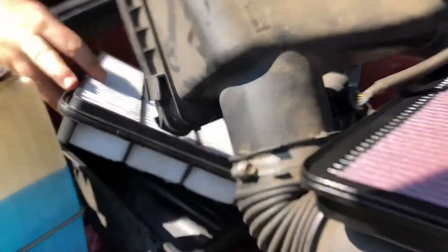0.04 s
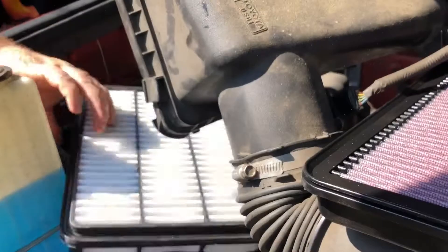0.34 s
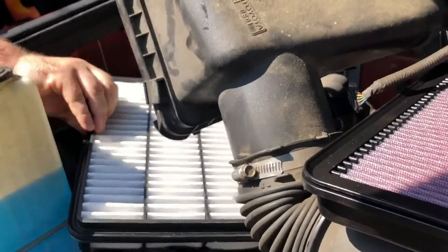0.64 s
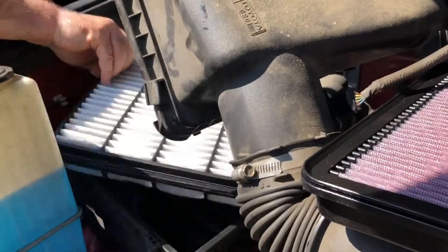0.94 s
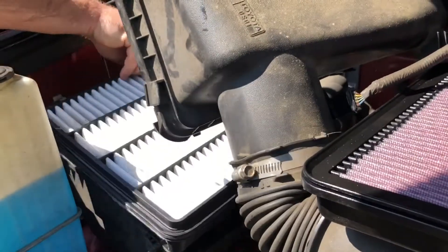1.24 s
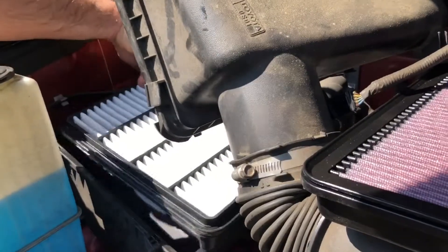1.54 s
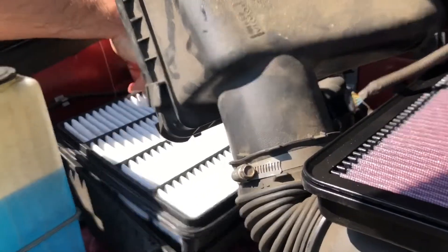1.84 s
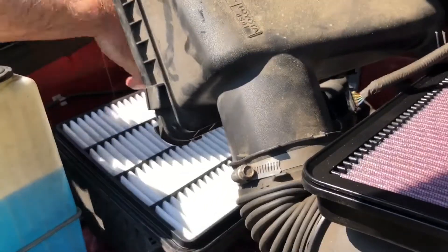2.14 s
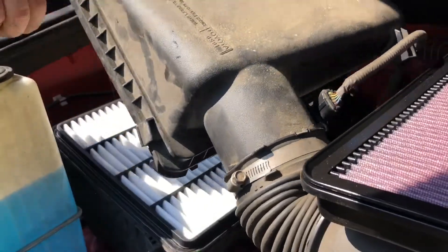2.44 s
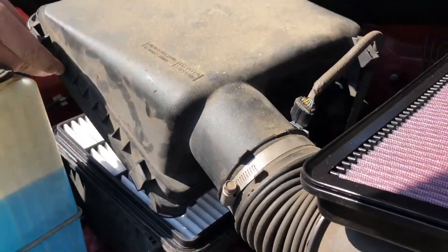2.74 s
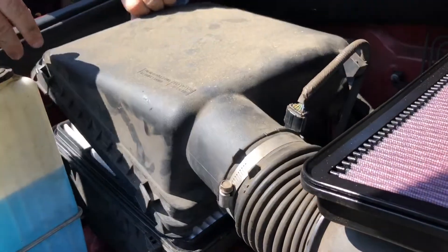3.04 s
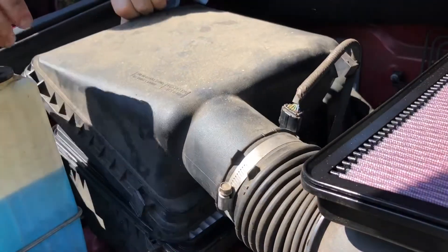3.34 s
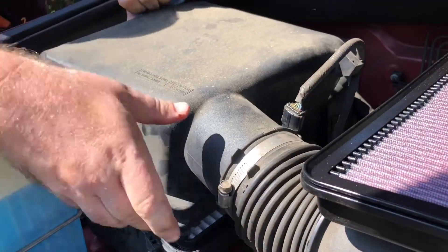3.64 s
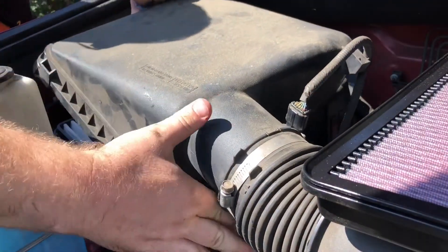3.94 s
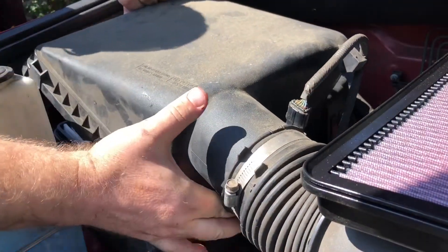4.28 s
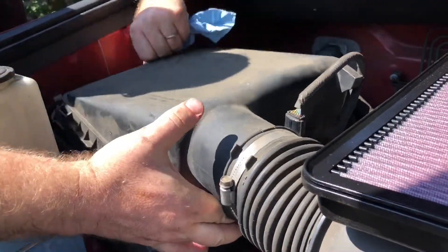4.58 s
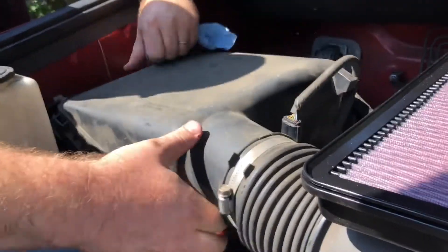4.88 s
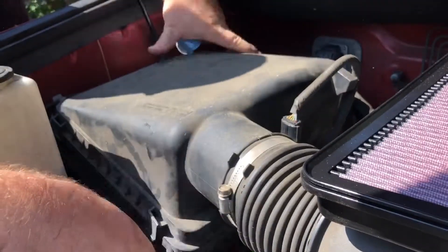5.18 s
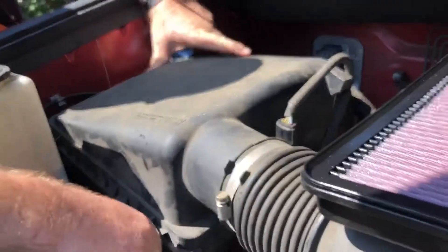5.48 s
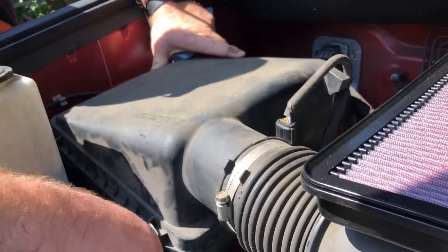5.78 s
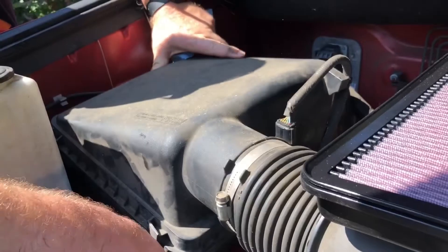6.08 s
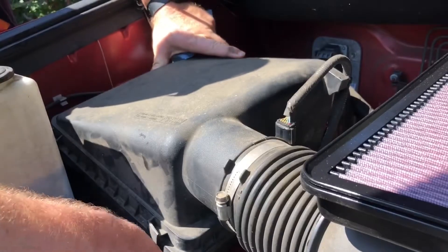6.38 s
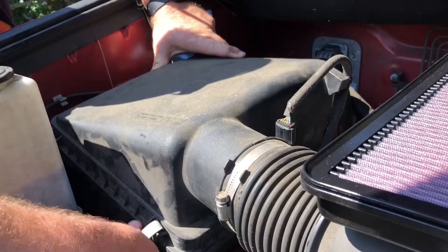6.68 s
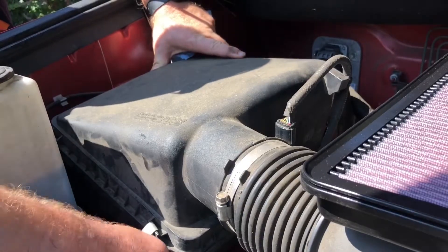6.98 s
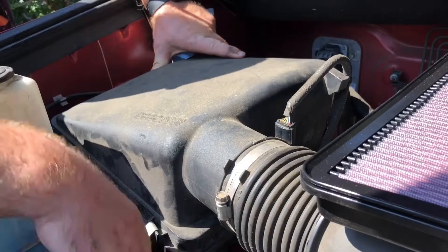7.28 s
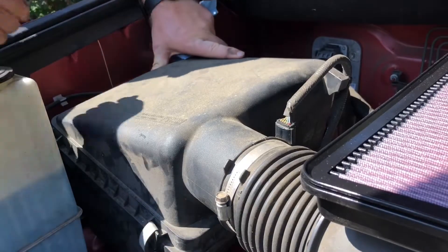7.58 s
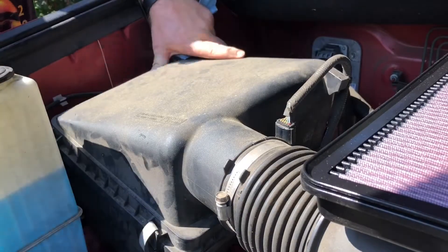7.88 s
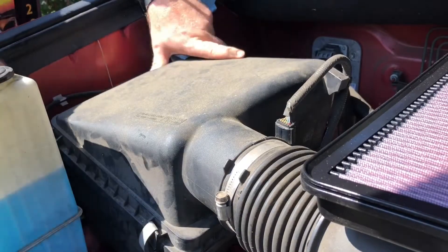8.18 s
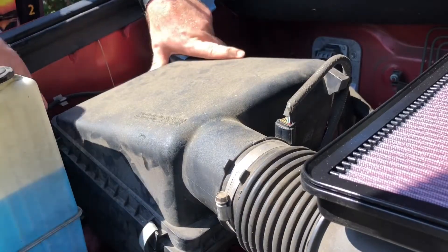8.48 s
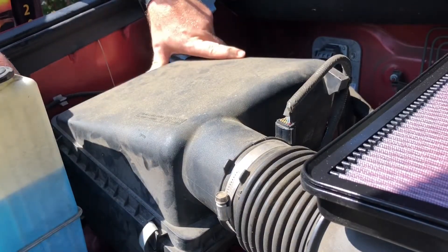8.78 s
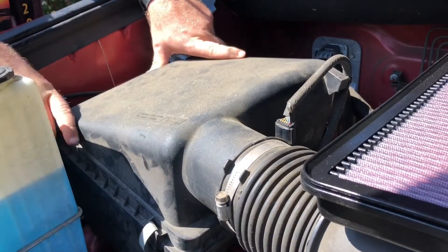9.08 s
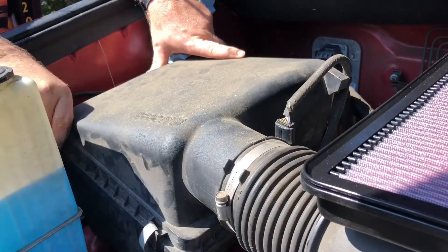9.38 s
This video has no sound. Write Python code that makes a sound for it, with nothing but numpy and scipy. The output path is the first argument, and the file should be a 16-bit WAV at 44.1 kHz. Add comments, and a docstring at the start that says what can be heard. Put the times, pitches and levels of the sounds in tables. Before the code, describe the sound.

Close up in an engine bay, a stiff filter frame clacks and rattles against a hollow plastic housing and drags briefly along its edge. A pause follows, then the lid thuds onto its rubber seal. Three crisp metal clip snaps and a weaker double click come next, with small ticks and rubbing fingers. A fan-like machine hums throughout while insects shrill faintly outdoors.

```python
"""A car's air filter is knocked into its hollow plastic box, clacking, scraping and crackling its pleats.
The lid thuds onto its rubber seal, fingers rub over it, and steel spring clips snap over the rim.
The close blows overload the microphone and echo briefly in the engine bay.
Behind it a machine hums, probably an air conditioner, and insects shrill outside."""
import sys
import numpy as np
from scipy import signal
from scipy.fft import rfft, irfft, next_fast_len
from scipy.io import wavfile
from scipy.ndimage import map_coordinates

SR = 44100
rng = np.random.default_rng(int(sys.argv[2]) if len(sys.argv) > 2 else 0)


def wav_out(sig):
    """Save sig, one row per channel (or a flat mono array), as 16-bit PCM at SR to the path in sys.argv[1]."""
    wavfile.write(sys.argv[1], SR, np.round(np.clip(np.atleast_2d(sig).T, -1, 1) * 32767).astype(np.int16))


N = 424241
TIME_S = np.arange(N) / SR
HIT_S = np.arange(SR // 4) / SR  # the life of one contact


def amp(db):
    """Decibels to gain."""
    return 10 ** (np.asarray(db) / 20)


def unit(x):
    """Scaled to rms 1."""
    return x / np.sqrt(np.mean(x ** 2) + 1e-20)


def blow(x):
    """Scaled to the energy of 20 ms at rms 1."""
    return x / np.sqrt(np.sum(x ** 2) / (SR / 50) + 1e-20)


def swell(middle_s, length_s):
    """An arch from 0 to 1 and back."""
    return np.maximum(0, 1 - (2 * (TIME_S - middle_s) / length_s) ** 2)


def wobble(rate_hz):
    """A smooth random curve."""
    knots = rng.standard_normal(4096)
    return map_coordinates(knots, [TIME_S * rate_hz], order=2, mode="wrap")


def tones(partials, drift_rad, rate_hz):
    """Steady (pitch_hz, rms_db) sines whose phases wander."""
    return sum(amp(db) * np.sqrt(2) * np.sin(2 * np.pi * hz * TIME_S + drift_rad * wobble(rate_hz))
               for hz, db in partials)


def noise(colour, size):
    """Noise of rms 1, shaped by a (freq_hz, gain_db) curve."""
    m = next_fast_len(size)
    hz, db = np.transpose(colour)
    gain = amp(np.interp(np.log(np.fft.rfftfreq(m, 1 / SR) + 1), np.log(hz), db))
    return unit(irfft(rfft(rng.standard_normal(m)) * gain, m)[:size])


def burst(colour, t60, attack=0.0001, tail_db=-22, tail_t60=0.18):
    """Countless close modes: noise that starts at once, dies fast and leaves a weak tail."""
    fade = amp(-60 * HIT_S / t60) + amp(tail_db - 60 * HIT_S / tail_t60)
    return blow(noise(colour, len(HIT_S)) * fade * (1 - np.exp(-HIT_S / attack)))


def ring(modes, attack, detune=0.018, scatter_db=1.2):
    """Damped modes; the place of contact and the grip change their strength, sign and pitch."""
    hz, db, t60 = np.transpose(modes)[:, :, None]
    level, pitch, sign = rng.standard_normal((3, len(modes), 1))
    fades = amp(db + scatter_db * level - 60 * HIT_S / t60)
    waves = np.sign(sign) * fades * np.sin(2 * np.pi * hz * (1 + detune * pitch) * HIT_S)
    return blow(waves.sum(axis=0) * (1 - np.exp(-HIT_S / attack)))


def add(track, start_s, sound):
    """Mix a sound into the track."""
    part = track[max(0, round(start_s * SR)):][:len(sound)]
    part += sound[:len(part)]


# colour of the fan's rush: freq_hz, gain_db
FAN_COLOUR = [(10, 9.5), (32, 2.5), (70, 1.5), (125, 2), (200, -6.5), (410, -0.5), (560, -5.5), (850, -9),
              (1400, -14), (1750, -20), (2900, -23.5), (3600, -27), (6300, -40), (15500, -46)]
# fader ride on the rush: time_s, level_db
FAN_RIDE = [(0, -32.5), (1, -34.5), (3, -37.5), (7, -36.5), (7.7, -35.5), (9.62, -35.5)]
# partials of the compressor hum and the whine: pitch_hz, level_db
HUM_PARTIALS = [(55.3, -36), (110.6, -48.5), (166, -53.5), (274.5, -66.5), (388, -53.5), (414, -59.5),
                (764.4, -55.5)]
WHINE_PARTIALS = [(1233, -54.5), (1292, -53.5), (1583, -62.5)]

def machine():
    """Fan rush and compressor hum; a thin whine creeps up, and it and a low drone each swell once."""
    fan_db = np.interp(TIME_S, *np.transpose(FAN_RIDE))
    rush = amp(fan_db) * noise(FAN_COLOUR, N)
    fade_in = np.minimum(1, TIME_S) ** 2
    whine_db = -5.5 + 0.7 * TIME_S + 3.5 * swell(middle_s=7.64, length_s=0.75)
    whine = fade_in * amp(whine_db) * tones(WHINE_PARTIALS, drift_rad=0.29, rate_hz=7.6)
    drone_db = -48 + 11.5 * swell(middle_s=4.08, length_s=1.4)
    drone = amp(drone_db) * tones([(75.2, 0)], drift_rad=0.7, rate_hz=3.7)
    hum = tones(HUM_PARTIALS, drift_rad=0.32, rate_hz=4.3)
    return rush + hum + whine + drone


# colours of the three insect choruses: freq_hz, gain_db
LOW_SHRILL = [(6400, -32), (7600, 6), (8300, 6.5), (9000, 3), (12500, -42)]
MID_SHRILL = [(6800, -12), (7700, -13.5), (8450, 0.5), (8950, -6.5), (9550, 1.5), (10000, -4.5),
              (10450, -2.5), (11100, -12.5), (11900, -21), (13200, -42)]
HIGH_SHRILL = [(8000, -13), (9500, -6), (10500, 6.5), (11700, 4), (15500, -17)]
# fader rides on the low, middle and high chorus: start_db, drift_db_per_s
CHORUS_RIDES = [(-52.5, -0.78), (-52.5, 0), (-64.5, 0.5)]
# a nearer insect's band around its centre pitch: offset_hz, gain_db
NEAR_INSECT_BAND = [(500, -4), (1200, -8), (3000, -38)]
# its calls: middle_s, length_s, level_db, centre_hz, glide_hz_per_s
NEAR_INSECT_CALLS = [(2.65, .9, -59, 11300, -1), (3.55, 0.49, -52.5, 9770, 1),
                     (7.652, 1, -51.5, 10040, 2198)]

def insects():
    """Three distant choruses shimmer; a nearer insect swells three times, the last with a rising glide."""
    out = np.zeros(N)
    for shrill, (start_db, drift_db_per_s) in zip((LOW_SHRILL, MID_SHRILL, HIGH_SHRILL), CHORUS_RIDES):
        out += amp(start_db + drift_db_per_s * TIME_S + 0.6 * wobble(7.5)) * noise(shrill, N)
    for middle_s, length_s, level_db, centre_hz, glide_hz_per_s in NEAR_INSECT_CALLS:
        pitch_hz = centre_hz + glide_hz_per_s * (TIME_S - middle_s)
        carrier = np.sin(2 * np.pi * np.cumsum(pitch_hz) / SR)
        out += amp(level_db) * swell(middle_s, length_s) * unit(carrier * noise(NEAR_INSECT_BAND, N))
    return out


# early reflections off the bodywork: delay_s, gain_db
PANEL_ECHOES = [(.0034, -15), (.0071, -16)]

def panels(x):
    """Reflections from the bonnet and wings comb-filter the background."""
    m = next_fast_len(N + SR // 2)
    hz = np.fft.rfftfreq(m, 1 / SR)
    low_cut = hz / (hz + 600)  # small panels reflect short waves only
    echoes = sum(amp(db) * np.exp(-2j * np.pi * hz * delay_s) for delay_s, db in PANEL_ECHOES)
    return irfft(rfft(x, m) * (1 + low_cut * echoes), m)[:N]


# modes of the open box's hollow and walls: pitch_hz, gain_db, t60_s
BOX_AIR_MODES = [(103.4, 1, 0.13), (166, 1, 0.05), (226, -4, 0.092), (273.4, 5.5, 0.053)]
BOX_WALL_MODES = [(486, -1.5, 0.021), (537, -9, 0.022), (580, 0.5, 0.079), (693, 0, 0.052),
                  (835, 1.5, 0.048), (956, -4.5, 0.062), (1063, -1.5, 0.065)]
# colours of the plastic's dull clack and bright crack: freq_hz, gain_db
CLACK_COLOUR = [(150, -22), (300, 12), (450, 6), (1050, -9), (1400, -5.5), (2000, -47)]
CRACK_COLOUR = [(800, -37), (1400, 10), (2100, 5), (3100, -3), (4200, -7.5), (6000, -17), (10000, -23),
                (16000, -52)]

def frame_blow(wall_db, thud_db):
    """One contact of filter frame and box: the walls clack, the hollow thuds, the edge cracks."""
    wall_ring = ring(BOX_WALL_MODES, attack=0.0007, detune=0.012)
    clack = burst(CLACK_COLOUR, t60=0.05, tail_db=-16, tail_t60=0.087)
    wall = blow(wall_ring + amp(-1) * clack)
    crack = burst(CRACK_COLOUR, t60=0.054, attack=0.00044, tail_db=-15, tail_t60=0.1)
    crack_db = -10.5 + 1.14 * wall_db  # harder hits are brighter
    thud = ring(BOX_AIR_MODES, attack=0.00036)
    return amp(wall_db) * wall + amp(thud_db) * thud + amp(crack_db) * crack


REBOUND_S, FRAME_REBOUND_DB, LID_REBOUND_DB = 0.024, -21.5, -19
# the filter frame, and last the lid's edge, hit the open box:
# start_s, body_db, body_pitch_hz, body_t60_s, wall_db, thud_db
FILTER_HITS = [(.002, -30, 325, 0.049, -25.5, -22), (0.2756, -3, 367, 0.097, -6.5, -24),
               (0.2844, -17, 385, 0.042, -21, -19), (.51, -23.5, 367, .09, -30, -36.5),
               (0.602, -12.5, 384, 0.098, -16.5, -19), (.686, -20.5, 360, 0.075, -32, -29),
               (.765, -15.5, 280, 0.02, -30, -25), (1.182, -23.5, 356, 0.11, -30.5, -32),
               (1.246, -8, 374.4, 0.068, -4.5, -18), (1.305, -13.5, 406, 0.085, -22.5, -23),
               (1.373, -16.5, 380, 0.07, -25.5, -29), (1.573, -13, 410, 0.049, -11.5, -18),
               (1.629, -21, 275, 0.072, -21.5, -25), (1.663, -14, 364, .05, -13.5, -22),
               (1.751, -15.5, 260, 0.045, -20, -17.5), (1.762, -13.5, 425, 0.056, -16, -22),
               (1.789, -10, 350, 0.076, -22, -19), (1.853, -6.5, 400, 0.03, -13.5, -14),
               (2.794, -28.5, 262, 0.11, -30, -31)]
# a corner of the tilted frame touches just before it lands: start_s, level_db
CORNER_TAPS = [(.596, -25), (1.238, -19), (1.566, -24.5), (1.743, -28), (1.846, -22)]

def filter_knocks():
    """The stiff frame strikes and rebounds; the spot sets the body's pitch and the grip damps it."""
    out = np.zeros(N)
    for start_s, level_db in CORNER_TAPS:
        add(out, start_s, frame_blow(level_db, level_db))
    for start_s, body_db, body_pitch_hz, body_t60_s, wall_db, thud_db in FILTER_HITS:
        body = ring([(body_pitch_hz, 0, body_t60_s)], attack=0.001, detune=0)
        add(out, start_s, amp(body_db) * body + frame_blow(wall_db, thud_db))
        add(out, start_s + REBOUND_S, frame_blow(wall_db + FRAME_REBOUND_DB, thud_db + FRAME_REBOUND_DB))
    return out


def engine_bay(x, t60):
    """A short, dull echo from the bonnet and the parts around."""
    dull_noise = noise([(60, 22), (400, 15), (2000, 0), (12000, -16)], len(HIT_S))
    tail = dull_noise * amp(-60 * HIT_S / t60) * (1 - np.exp(-HIT_S / 0.00013))
    return signal.fftconvolve(x, tail / np.linalg.norm(tail))[:N]


# colours of a midrange tick and a crisp click: freq_hz, gain_db
TICK_COLOUR = [(900, 7), (1500, 9), (2300, 5), (3600, -5), (4400, -4), (6000, -35), (13000, -40)]
CLICK_COLOUR = [(2800, -11), (4500, -2), (8300, 4), (10000, -9), (15500, -23)]
# small handling noises: start_s, tick_db, click_db
HANDLING_TICKS = [(0.036, -38.5, -61), (0.13, -59, -47), (.3425, -37, -57), (0.629, -38, -57),
                  (0.841, -43, -58), (3.053, -49, -50), (3.586, -65, -44), (3.6012, -65, -45.5),
                  (6.073, -45, -49.5), (6.09, -43, -66), (6.577, -42, -65), (6.609, -47, -67),
                  (7.357, -49, -50), (8.724, -39.5, -54), (8.812, -42, -62), (8.947, -43.5, -56),
                  (9.076, -50, -53), (9.311, -38, -60)]

def ticks():
    """Tiny slips of plastic and steel under the fingers."""
    out = np.zeros(N)
    for start_s, tick_db, click_db in HANDLING_TICKS:
        tick = burst(TICK_COLOUR, t60=0.029)
        click = burst(CLICK_COLOUR, t60=0.0055, tail_db=-33)
        add(out, start_s, amp(tick_db) * tick + amp(click_db) * click)
    return out


# colour of the dry hiss of paper and skin: freq_hz, gain_db
HISS_COLOUR = [(2500, -16), (4300, -2), (6500, -2), (10000, -38)]

def pleats(pops_per_s=27, until_s=1.4):
    """The paper pleats crackle at random, in pops of uneven size, while the filter is handled."""
    pops = (rng.random(N) < pops_per_s / SR) * rng.standard_normal(N) * (TIME_S < until_s)
    paper = burst(TICK_COLOUR, t60=0.03) + burst(HISS_COLOUR, t60=0.03) / 2
    return amp(-60) * signal.fftconvolve(pops, paper)[:N]


# drags of the filter's or lid's edge: middle_s, length_s, groan_db, rasp_db
EDGE_DRAGS = [(0.268, 0.054, -20.5, -55), (1.703, 0.12, -18.5, -45), (1.78, 0.094, -17, -25.5),
              (4.623, 0.086, -28.5, -43), (5.231, 0.06, -24, -32)]

def scrapes(slips_per_s=430):
    """An edge drags along the box: uneven slips keep the body groaning and the edge rasping."""
    slips = (rng.random(N) < slips_per_s / SR) * rng.standard_normal(N)
    body = ring([(402, 0, 0.036)], attack=0.00052, detune=0) + burst(CLACK_COLOUR, t60=0.035, tail_db=-40)
    groan = unit(signal.fftconvolve(slips, body)[:N])
    rasp = unit(amp(3 * wobble(slips_per_s)) * noise(CRACK_COLOUR, N))
    return sum(swell(middle_s, length_s) * (amp(groan_db) * groan + amp(rasp_db) * rasp)
               for middle_s, length_s, groan_db, rasp_db in EDGE_DRAGS)


# low colour of the plastic rim, rubbed or struck: freq_hz, gain_db
RIM_COLOUR = [(80, -10), (230, -11), (350, -6.5), (600, 0.5), (900, -5.5), (1300, -6), (2000, -48)]
# strokes over the lid and clips: middle_s, length_s, groan_db, scratch_db, hiss_db
FINGER_STROKES = [(0.911, 0.059, -37, -45, -63), (6.113, 0.12, -41.5, -51, -64),
                  (6.738, 0.1, -32.5, -44, -55), (7.385, 0.063, -60, -47, -56),
                  (7.758, 0.14, -44, -51, -54), (8.228, 0.13, -36.5, -45, -64),
                  (8.866, 0.082, -37.5, -51, -69)]

def rubs():
    """A finger stroke swells and fades, sticking and slipping on the way."""
    slips = unit(amp(6 * wobble(170)))
    layers = slips * np.array([noise(colour, N) for colour in (RIM_COLOUR, TICK_COLOUR, HISS_COLOUR)])
    return sum(swell(middle_s, length_s) * (amp(levels_db) @ layers)
               for middle_s, length_s, *levels_db in FINGER_STROKES)


# modes of the hollow and walls with the lid on: pitch_hz, gain_db, t60_s
LID_AIR_MODES = [(38, -2.5, 0.075), (69.5, 2, 0.074), (104, 5, 0.052), (157, 2.5, 0.07), (230, 1, 0.062)]
LID_WALL_MODES = [(287, 1, 0.048), (353, 2.5, 0.087), (460, 0, 0.043), (526, 2, 0.051), (641, 0.5, 0.045),
                  (794, -3, 0.04)]
# the lid bumps and seats: landing_s, wall_db, thud_db
LID_LANDINGS = [(4.361, -27.5, -25), (4.5, -23, -30), (4.581, -22.5, -32), (4.593, -23, -21),
                (4.611, -22.5, -12.5), (5.075, -34, -32.5), (5.232, -14, -11.5), (5.238, -11, -24),
                (5.326, -24.5, -21), (5.341, -13.5, -16)]

def lid_bumps():
    """The lid lands on the rubber seal and rebounds once: soft contacts with a deep ring."""
    out = np.zeros(N)
    for landing_s, wall_db, thud_db in LID_LANDINGS:
        for start_s, force_db in ((landing_s, 0), (landing_s + REBOUND_S, LID_REBOUND_DB)):
            wall_ring = ring(LID_WALL_MODES, attack=0.00092)
            clack = burst(CLACK_COLOUR, t60=0.048, tail_db=-12.5, tail_t60=0.33)
            wall = blow(wall_ring + amp(-3) * clack)
            crack = burst(CRACK_COLOUR, t60=0.073, attack=0.00023)
            crack_db = -23.5 + 0.74 * (wall_db + force_db)  # harder hits crack louder
            thud = ring(LID_AIR_MODES, attack=0.0022, detune=0.052)
            bump = amp(thud_db) * thud + amp(wall_db) * wall
            add(out, start_s, amp(force_db) * bump + amp(crack_db) * crack)
    return out


# modes of the plastic rim and the steel clip: pitch_hz, gain_db, t60_s
RIM_MODES = [(345, -15, .06), (1070, -17, .07)]
CLIP_MODES = [(1560, -5, 0.083), (1897, 3, 0.037), (2155, 2, 0.041), (2370, 10, 0.024), (2870, 3.5, 0.041),
              (3360, 6, 0.032), (3770, 7.5, 0.025)]
# colour of the snap's top end: freq_hz, gain_db
SIZZLE_COLOUR = [(3300, -37), (4500, 8.5), (5400, -1.5), (6300, 4), (8000, 0), (9200, -13), (12500, -5),
                 (16000, -35)]
# clips touch the rim and snap shut: start_s, rim_db, steel_db, sizzle_db, rim_hz, spring_hz
CLIP_HITS = [(4.707, -36.5, -42, -66, 1370, 2020), (5.505, -33.5, -40, -54, 650, 1520),
             (5.6332, -19, -16.5, -25, 880, 2690), (6.3403, -16.5, -19.5, -34.5, 838, 1640),
             (6.716, -27, -41, -55, 840, 1400), (6.773, -33, -43, -60, 1530, 1640),
             (6.9177, -11.5, -15.5, -22.5, 760, 3350), (7.078, -28.5, -41.5, -59, 530, 3460),
             (8.311, -32, -25.5, -33, 480, 4000), (8.370, -32, -38, -53, 957, 1900),
             (8.3749, -32, -27.5, -37.5, 510, 2050)]

def clip_snaps():
    """A spring clip goes over centre and slaps the rim; each spot and spring has its own main pitch."""
    out = np.zeros(N)
    for start_s, rim_db, steel_db, sizzle_db, rim_hz, spring_hz in CLIP_HITS:
        rim_ring = ring([(rim_hz, 0, 0.05)] + RIM_MODES, attack=0.0002, detune=0)
        slap = burst(RIM_COLOUR, t60=0.036, tail_db=-32, tail_t60=0.074)
        rim = blow(rim_ring + amp(-1) * slap)
        # the bent spring has a cluster of close modes around its main pitch
        spring = burst([(spring_hz / 2, -45), (spring_hz, 0), (spring_hz * 2, -45)], t60=0.033, tail_db=-28)
        ping = ring(CLIP_MODES, attack=0.0001, detune=0.0095)
        tick = burst(TICK_COLOUR, t60=0.051, tail_db=-36)
        steel = blow(amp(-1.5) * spring + amp(-2) * ping + tick)
        sizzle = burst(SIZZLE_COLOUR, t60=0.01, tail_db=-8, tail_t60=0.05)
        sizzle += amp(-5) * burst(CLICK_COLOUR, t60=0.0064, tail_db=-47)
        add(out, start_s, amp(rim_db) * rim + amp(steel_db) * steel + amp(sizzle_db) * sizzle)
    return out


def scene():
    """Mono mix: the close work on the box and its echo over a bed of machine and insects."""
    work = filter_knocks() + lid_bumps() + clip_snaps() + ticks() + pleats() + scrapes() + rubs()
    echo = amp(-19) * engine_bay(work, t60=0.17)
    bed = panels(machine() + insects())
    return (work + echo + bed)[None]


def record(dry):
    """The microphone saturates near full scale and keeps nothing above its band limit."""
    clipped = 0.98 * dry / (1 + np.abs(dry) ** 6) ** (1 / 6)
    m = next_fast_len(N + SR // 2)
    hz = np.fft.rfftfreq(m, 1 / SR)
    return irfft(rfft(clipped, m) * (hz < 15850), m)[..., :N]


dry = scene()
out = record(dry)
wav_out(out)
```